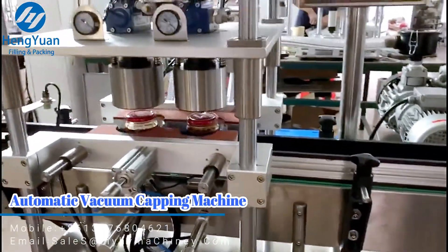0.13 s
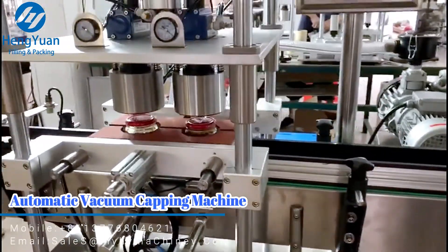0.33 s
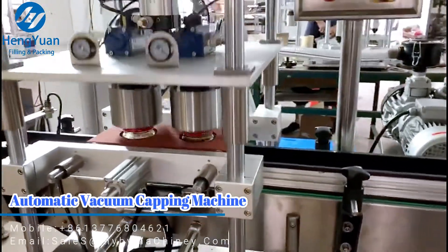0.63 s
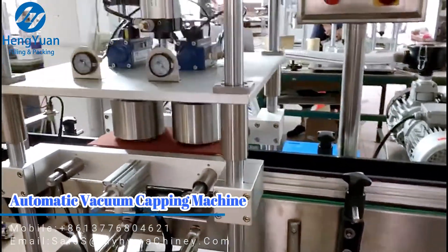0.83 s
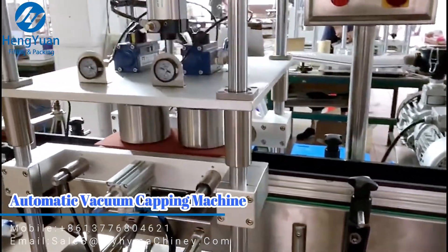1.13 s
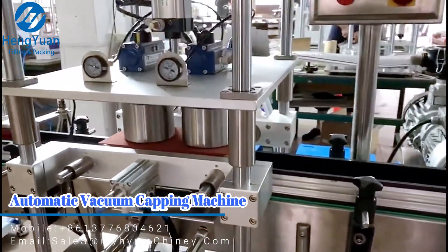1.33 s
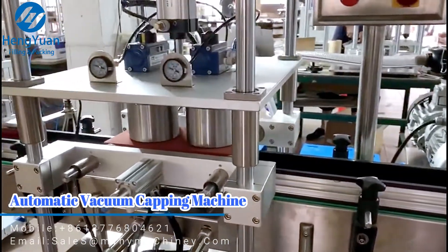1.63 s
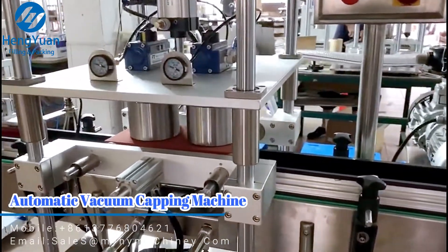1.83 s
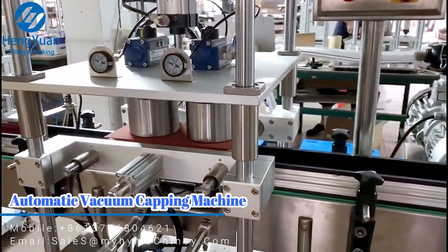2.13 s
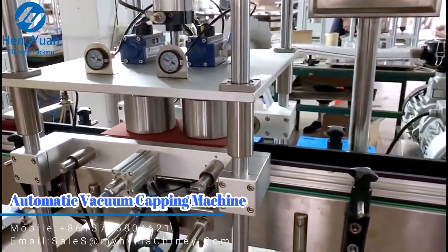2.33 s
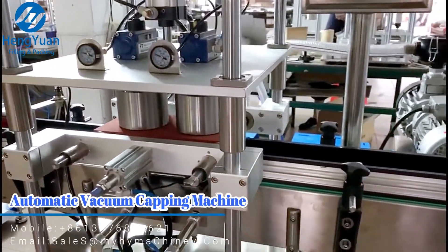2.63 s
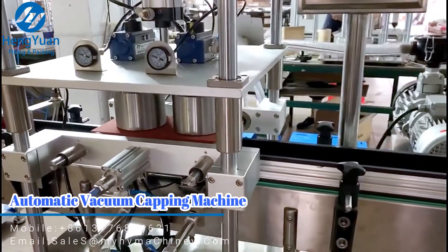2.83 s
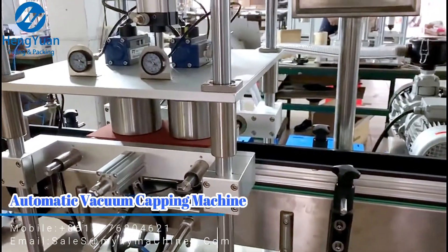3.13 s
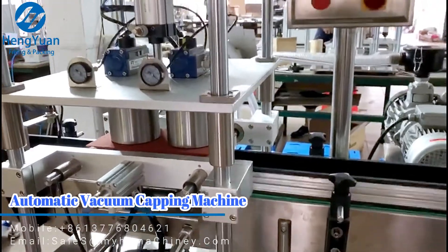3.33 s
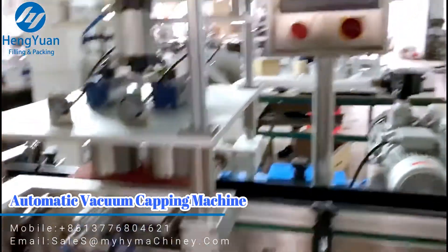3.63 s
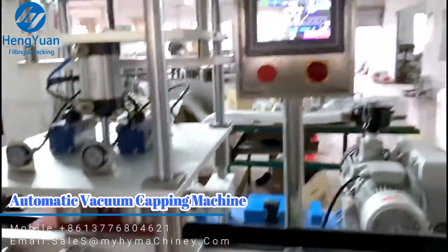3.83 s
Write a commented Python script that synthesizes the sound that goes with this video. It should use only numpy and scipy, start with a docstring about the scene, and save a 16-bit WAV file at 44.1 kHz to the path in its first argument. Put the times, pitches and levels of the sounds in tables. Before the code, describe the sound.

Close by in a factory hall, a capping machine clunks and hisses, pops out air with brief falling whistles, rattles, quietens, then thumps and vents again, ending on a sharp air blast over steady low hum.

```python
"""A conveyor rumbles under humming motors and a steady hall wash while a thin air leak hisses, then closes.
Over this bed a pneumatic jar-capping machine works through one cycle: its head thumps, parts knock and clack,
loose fittings chatter, cylinders vent, and solenoid valves tick and dump air with a falling whistle.
Air and wash are coloured noise, hum and whistles unsteady tones, and struck parts damped sines or noise bursts."""
import sys
import numpy as np
from scipy import signal
from scipy.fft import rfft, irfft
from scipy.io import wavfile

SR = 44100
rng = np.random.default_rng(int(sys.argv[2]) if len(sys.argv) > 2 else 0)


def materialize(psi):
    """Save the field psi as 16-bit PCM at rate SR to the path in sys.argv[1].

    A 1-D psi becomes a single channel; in a 2-D psi each row is a channel.
    """
    bounded = np.clip(np.atleast_2d(psi).T, -1, 1)
    quanta = np.round(bounded * 32767).astype(np.int16)
    wavfile.write(sys.argv[1], SR, quanta)


N = 176400
T = np.arange(N) / SR
FREQS = np.maximum(np.fft.rfftfreq(N, 1 / SR), 1)


def undb(db):
    """Decibels to an amplitude factor."""
    return 10 ** (np.asarray(db) / 20)


def unit(x):
    """Scale to an RMS of 1."""
    return x / np.sqrt(np.mean(x ** 2))


def across(points, axis=1):
    """One column of a spectrum table at every frequency, joined along log frequency."""
    points = np.array(points, float)
    return np.interp(np.log(FREQS), np.log(points[:, 0]), points[:, axis])


def wander(x, step):
    """A random value of unit spread at every step along x, with straight glides between."""
    return np.interp(x / step, np.arange(8192), rng.standard_normal(8192))


def envelope(start, rise, length, fall, sag_db=0):
    """Rise, sag in dB per second until length after the start, then die away exponentially."""
    t = np.maximum(T - start, 0)
    opening = np.minimum(t / rise, 1)
    sag = undb(-sag_db * np.minimum(t, length))
    closing = np.exp(-np.minimum(np.maximum(t - length, 0) / fall, 60))
    return opening * sag * closing


# the two microphones: (frequency [Hz], likeness [0-1], left minus right [dB])
MICROPHONES = [(30, 0.85, 6), (99, 0.93, -2), (220, 0.91, -0.5), (425, 0.5, 0.5), (900, 0.1, 7),
               (1600, 0, 3), (3400, 0.17, 1.5), (7400, 0, -0.5), (14100, 0.5, 0)]
RIPPLE_ROOT_HZ = 0.55  # spacing of ripple points, in square-root Hz


def noise(colour, ripple_db=0):
    """Coloured noise at two microphones: likeness sets the balance of their sum and difference."""
    like = np.clip(across(MICROPHONES), -1, 1)
    mid, side = rfft(rng.standard_normal((2, N))) * np.sqrt([1 + like, 1 - like])
    ripple = ripple_db * wander(np.sqrt(FREQS), RIPPLE_ROOT_HZ)
    gain = undb(across(colour) + ripple)
    return unit(irfft(np.array([mid + side, mid - side]) * gain, N))


def whistle(hz, width_hz):
    """An unsteady tone in two channels: random drift of size and phase widens its line."""
    drift = np.array([wander(T, 1 / width_hz) + 1j * wander(T, 1 / width_hz) for _ in range(2)])
    carrier = np.exp(2j * np.pi * np.cumsum(hz + 0 * T) / SR)
    return unit((drift * carrier).real)


RIPPLE_DB, RIPPLE_SHIFTS_PER_S = 5.5, 3.5
JET_FLUTTER_DB, JET_FLUTTER_S = 2.5, 0.012


def jet(colour):
    """Escaping air flutters; nearby steel plates ripple its spectrum, and the fine colour keeps shifting."""
    turn = 2 * np.pi * (RIPPLE_SHIFTS_PER_S * T + rng.random())
    air = np.cos(turn) * noise(colour, RIPPLE_DB) + np.sin(turn) * noise(colour, RIPPLE_DB)
    return unit(air * undb(JET_FLUTTER_DB * wander(T, JET_FLUTTER_S)))


# colour of the hall wash: (frequency [Hz], relative level per hertz [dB])
HALL_COLOUR = [(25, 17), (100, -1), (300, 0.5), (500, 4.5), (700, 0), (1000, 4), (2200, 5), (3200, 0.5),
               (4500, -2), (6800, -10.5), (9000, -2.5), (11200, -23), (12500, -4.5), (15500, -17)]
HALL_DB = -44.5


def hall_wash():
    """Steady broad noise stands for the blended sound of the hall."""
    return noise(HALL_COLOUR) * undb(HALL_DB)


# motor hum tones: (frequency [Hz], level [dB])
HUM_TONES = [(65, -52), (95, -52), (188.4, -54.5), (279.9, -53.5)]
HUM_WAVER_HZ = 5


def motor_hum():
    """Low motor tones waver independently, the same in both channels."""
    return sum(undb(db) * whistle(hz, HUM_WAVER_HZ)[0] for hz, db in HUM_TONES)


# conveyor loudness: (time [s], level [dB])
CONVEYOR_LEVEL = [(0, -35), (.6, -35.5), (1.2, -36.5), (1.5, -41), (1.8, -36.5), (2.3, -34), (2.65, -44.5),
                  (3.1, -38.5), (3.4, -40.5), (4, -45.5)]
# conveyor colour: (frequency [Hz], relative level per hertz [dB])
RUMBLE_COLOUR = [(20, -18), (35, -18), (50, 6), (70, -2), (100, 3.5), (125, 1), (155, -8), (195, -12.5),
                 (400, -12.5), (800, -25), (3000, -62)]


def conveyor():
    """Low coloured noise makes the conveyor rumble, its loudness swelling and easing."""
    times, levels_db = np.array(CONVEYOR_LEVEL).T
    return noise(RUMBLE_COLOUR) * undb(np.interp(T, times, levels_db))


# fine air sizzle, also used by vents and valve ticks: (frequency [Hz], relative level per hertz [dB])
SIZZLE_COLOUR = [(500, -8), (2000, -14), (5800, -0.5), (7100, -13), (8500, 2.5), (10200, 4.5), (11300, -38),
                 (12400, 9), (14000, 1.5), (15500, -9)]
LEAK_HZ, LEAK_WIDTH_HZ = 10300, 100
LEAK_DB, LEAK_WHISTLE_DB, LEAK_SAG_DB_PER_S, LEAK_END_S = -41, -53, 32, 0.54


def air_leak():
    """A thin leak hisses and whistles, sags, then closes."""
    hiss = undb(LEAK_DB) * noise(SIZZLE_COLOUR)
    tone = undb(LEAK_WHISTLE_DB) * whistle(LEAK_HZ, LEAK_WIDTH_HZ)
    return (hiss + tone) * envelope(0, 0.0026, LEAK_END_S, 0.037, LEAK_SAG_DB_PER_S)


# loose parts while the head travels: (start [s], end [s], smallest tick level [dB], centre pitch [Hz])
CHATTER_SPELLS = [(0.593, 0.862, -45, 2430), (0.893, 1.199, -48.5, 1127), (1.66, 2.37, -42, 515)]
CHATTER_PER_S, CHATTER_SPAN_DB, CHATTER_RING_S, CHATTER_SPREAD_OCTAVES = 110, 12, 0.0055, 2.124


def chatter():
    """Caps, jars and fittings tick against each other, each with its own short damped ring."""
    out, t = np.zeros((2, N)), T[:SR // 10]
    for first, last, db, centre_hz in CHATTER_SPELLS:
        span = last - first
        ticks = rng.random(size=(128, 5))[:int(span * CHATTER_PER_S)]
        for when, pitch, size, left, right in ticks:
            hz = centre_hz * 2 ** (CHATTER_SPREAD_OCTAVES * (pitch - 0.5))
            phase = np.array([[left], [right]])
            ring = np.sin(2 * np.pi * (hz * t + phase)) * np.exp(-t / CHATTER_RING_S)
            i = int((first + when * span) * SR)
            out[:, i:i + len(t)] += undb(db + CHATTER_SPAN_DB * size ** 2) * ring  # mostly small ticks
    return out


# hollow knocks of jars, clamps and plates: (time [s], level [dB], centre pitch [Hz], ring decay [s])
KNOCK_HITS = [(0.111, -40, 441, 0.03), (.32, -31.5, 983, 0.0057), (.337, -37, 1015, 0.023),
              (.365, -25.5, 990, 0.0064), (.372, -33, 529, 0.023), (.377, -20, 268, 0.011),
              (0.656, -31.5, 2694, 0.016), (.786, -33, 3000, 0.014), (.814, -29.5, 1464, 0.0088),
              (.882, -23, 950, 0.0058), (.889, -31, 560.3, 0.026), (1.07, -37.5, 1030, 0.022),
              (1.641, -25, 374, 0.014), (1.807, -29, 345, 0.0068), (1.823, -29, 285.7, 0.057),
              (1.939, -24, 365, 0.0072), (2.017, -37, 333.3, 0.076), (2.14, -27, 378, 0.013),
              (2.153, -26, 250.3, 0.032), (2.221, -34.5, 954, 0.012), (2.236, -32.5, 399, 0.024),
              (2.348, -35, 493, 0.011), (2.81, -41.5, 400, 0.051), (3.116, -30.5, 1597, .014),
              (3.118, -36, 352.4, 0.075), (3.173, -22, 1250, 0.0083), (3.18, -24.5, 598, 0.0099),
              (3.943, -28, 437, 0.017)]
KNOCK_SPREAD_OCTAVES, KNOCK_APART_HZ = 1.2, 830
STRIKE_RISE_S = 0.00057  # shared by knocks and clacks


def knocks():
    """Each struck part rings in six damped modes; the higher ones reach the microphones out of step."""
    out, t = np.zeros((2, N)), T[:SR // 2]
    for start, db, hz, ring in KNOCK_HITS:
        place, phase, skew = rng.random((3, 6, 1))
        position = (np.arange(len(place))[:, None] + place) / len(place)
        mode_hz = hz * 2 ** (KNOCK_SPREAD_OCTAVES * (position - 0.5))
        apart = (skew - 0.5) * np.minimum(mode_hz / KNOCK_APART_HZ, 1) ** 2 / 2
        modes = np.sin(2 * np.pi * (mode_hz * t + phase + np.array([apart, -apart]))).sum(axis=1)
        shape = envelope(0, STRIKE_RISE_S, STRIKE_RISE_S, ring)[:len(t)]
        # the level holds however the random modes add up
        blow = undb(db) * unit(modes * shape) * np.sqrt(np.mean(shape ** 2))
        i = int(start * SR)
        out[:, i:i + len(t)] += blow[:, :N - i]
    return out


# light metal contacts: (time [s], level [dB], noise decay [s])
CLACK_HITS = [(.363, -33.5, 0.019), (.513, -32.5, .014), (.814, -32, 0.013), (0.934, -37, 0.018),
              (1.066, -34, 0.032), (1.639, -31.5, .0064), (1.688, -35.5, 0.39), (1.939, -24.5, 0.0088),
              (2.017, -38.5, 0.053), (3.115, -38, 0.025), (3.173, -33.5, 0.034)]
# clack colour: (frequency [Hz], relative level per hertz [dB])
CLACK_COLOUR = [(300, -3), (650, -12.5), (900, 12), (1400, 5), (2000, -4.5), (4000, 5), (7000, -22),
                (15000, -55)]
# ringing of the frame: (frequency [Hz], relative level [dB], time to fall 60 dB [s])
FRAME_MODES = [(397, -7, 0.08), (911, -1, 0.14), (953, -14, 0.11), (1183, 5, 0.12), (1360, 3, 0.13),
               (2060, -9, 0.27)]
FRAME_DB = -5.5


def clacks():
    """Clamps and fittings meet: a burst of bright noise, and an impulse that rings the frame's modes."""
    clack, pushes, out = noise(CLACK_COLOUR), np.zeros((2, N)), 0
    for start, db, ring in CLACK_HITS:
        out = out + undb(db) * clack * envelope(start, STRIKE_RISE_S, STRIKE_RISE_S, ring)
        pushes[:, min(int(start * SR), N - 1)] += undb(db)
    frame = 0
    for hz, db, t60 in FRAME_MODES:
        phase = rng.random((2, 1))
        frame = frame + undb(db - 60 * T / t60) * np.sin(2 * np.pi * (hz * T + phase))
    return out + undb(FRAME_DB) * signal.fftconvolve(pushes, frame, axes=1)[:, :N]


# heavy stops of the head and slides: (time [s], level [dB], starting pitch [Hz], ring decay [s])
THUMP_HITS = [(.386, -16.5, 210, 0.019), (0.52, -23, 104, 0.012), (0.823, -18, 117, 0.011),
              (1.065, -23.5, 293, 0.0053), (2.022, -19.5, 95.5, 0.0097), (2.304, -25, 126, 0.011),
              (3.12, -16, 111, 0.014)]
THUMP_RISE_S, THUMP_SETTLE_S, BED_HZ = 0.0071, 0.01, 88


def thumps():
    """A cushioned stop heaves the machine bed: a damped sine whose pitch settles to the bed's own."""
    out = 0
    for start, db, hz, ring in THUMP_HITS:
        t = np.maximum(T - start, 0)
        settling = THUMP_SETTLE_S * (1 - np.exp(-t / THUMP_SETTLE_S))
        turns = BED_HZ * t + (hz - BED_HZ) * settling
        heave = np.sqrt(2) * np.sin(2 * np.pi * turns)
        out = out - undb(db) * heave * envelope(start, THUMP_RISE_S, THUMP_RISE_S, ring)
    return out


# cylinder vents; length runs from the start to the final fall, and a negative sag swells:
# (time [s], rise [s], length [s], sag [dB/s], rush level [dB], sizzle level [dB])
VENT_EVENTS = [(0.501, 0.033, 0.055, 77, -26, -25), (0.552, 0.018, 0.298, -9, -41, -41),
               (0.868, 0.0051, 0.0046, 60, -43, -18), (0.877, 0.024, .16, 56, -29.5, -22.5),
               (0.872, 0.063, 0.37, 24, -27.5, -60), (1.537, 0.0063, 0.093, 32, -32.5, -46),
               (1.736, 0.017, 0.3, 18, -34.5, -45), (2.013, 0.0068, 0.023, 80, -23.5, -51),
               (2.058, 0.016, 0.18, 45, -34, -49), (2.29, 0.021, 0.026, 75, -37.5, -35),
               (2.797, 0.008, 0.056, 230, -25, -30.5), (3.107, 0.013, 0.055, 48, -29, -33.5),
               (3.162, 0.014, 0.068, 100, -51, -20), (3.194, 0.023, 0.066, 68, -33, -45)]
# broad rush of the silencers: (frequency [Hz], relative level per hertz [dB])
RUSH_COLOUR = [(200, -6), (600, -2), (1200, 0.5), (2200, 7), (3000, 3.5), (4000, 6.5), (5800, 2),
               (7100, -6), (8600, -0.5), (11000, -22), (15000, -68)]
VENT_FALL_S = 0.025


def vents():
    """Cylinders exhaust through silencers: a broad rush and a fine sizzle, most sagging as they empty."""
    out = 0
    for start, rise, length, sag_db, rush_db, sizzle_db in VENT_EVENTS:
        air = undb(rush_db) * jet(RUSH_COLOUR) + undb(sizzle_db) * jet(SIZZLE_COLOUR)
        out = out + air * envelope(start, rise, length, VENT_FALL_S, sag_db)
    return out


# valve dumps: (time [s], blast level [dB], following hiss level [dB], hiss length [s])
VALVE_DUMPS = [(1.64, -16, -23, .085), (1.938, -16, -22, .105), (3.941, -15.5, -22, .09)]
# colour of the dumped air: (frequency [Hz], relative level per hertz [dB])
BLAST_COLOUR = [(200, 3), (450, -1), (680, -13), (1300, -6.5), (2000, 2), (2700, 7.5), (4000, -0.5),
                (5800, 7), (7100, -1.5), (8400, 7.5), (10300, 7.5), (11300, -20.5), (13200, 12),
                (15500, -7)]
BLAST_RISE_S, BLAST_LENGTH_S, BLAST_FALL_S = 0.006, 0.0053, 0.012  # the fall starts before the rise ends
FOLLOW_SAG_DB_PER_S, FOLLOW_FALL_S = 16, 0.021
TICK_LEAD_S, TICK_DB, TICK_FALL_S = 0.0094, -21.5, 0.0035
WHISTLE_HZ, WHISTLE_SAG_PER_S, WHISTLE_WIDTH_HZ = 6440, 14, 510
WHISTLE_DB, WHISTLE_LENGTH_S = -0.5, 0.039  # level relative to the blast
SPIT_DB, SPIT_S, WHISTLE_JITTER = -1.5, 0.002, 0.09  # the blast sputters as the valve opens


def valves():
    """A solenoid tick, a spitting blast whose broken whistle falls with the pressure, then the rest of the air."""
    tick, out = noise(SIZZLE_COLOUR), 0
    for start, db, follow_db, length in VALVE_DUMPS:
        pressure_fall = -WHISTLE_SAG_PER_S * np.maximum(T - start, 0)
        hz = WHISTLE_HZ * np.exp(pressure_fall + WHISTLE_JITTER * wander(T, SPIT_S))
        spit = unit(undb(SPIT_DB * np.tanh(wander(T, SPIT_S))))
        blast = undb(db) * spit * envelope(start, BLAST_RISE_S, BLAST_LENGTH_S, BLAST_FALL_S)
        follow_shape = envelope(start + BLAST_LENGTH_S, 0.01, length, FOLLOW_FALL_S, FOLLOW_SAG_DB_PER_S)
        flow = blast + undb(follow_db) * follow_shape
        tick_shape = envelope(start - TICK_LEAD_S, 0.0011, 0.00092, TICK_FALL_S)
        tone_shape = envelope(start, BLAST_RISE_S, WHISTLE_LENGTH_S, TICK_FALL_S, sag_db=330)
        tone = spit * whistle(hz, WHISTLE_WIDTH_HZ) * tone_shape
        out = out + flow * jet(BLAST_COLOUR)
        out = out + undb(TICK_DB) * tick * tick_shape
        out = out + undb(db + WHISTLE_DB) * tone
    return out


ROOM_DB, ROOM_LOW_DB, ROOM_T60_S, ROOM_LONG_T60_S = -7.5, -13, 0.29, 0.84


def room(x):
    """The hall's tail is decaying noise in three parts: short midrange, longer full-band and short bass."""
    # (colour as (frequency [Hz], level [dB]), time to fall 60 dB [s], level [dB])
    parts = [([(150, -50), (400, -1), (4500, -5), (7000, -14)], ROOM_T60_S, ROOM_DB),
             ([(4500, 6.6), (7000, 7.1)], ROOM_LONG_T60_S, ROOM_DB - 9.5),
             ([(150, 1), (400, -31)], ROOM_T60_S, ROOM_LOW_DB)]
    tail = 0
    for colour, t60, db in parts:
        decay = envelope(0.0008, 0.004, 0.0081, t60 / np.log(1000))
        response = unit(rng.standard_normal((2, N)) * decay) / np.sqrt(N)
        tail = tail + undb(db) * irfft(rfft(response) * undb(across(colour)), N)
    return signal.fftconvolve(x, tail[:, :N // 2], axes=1)[:, :N]


def scene():
    """Machine in its room, thumps and background, balanced between the microphones at each frequency."""
    background = hall_wash() + motor_hum() + conveyor() + air_leak()
    machine = chatter() + knocks() + clacks() + vents() + valves()
    sound = background + thumps() + machine + room(machine)
    balance_db = across(MICROPHONES, axis=2)
    # each bin is doubled to fit the spectrum padded to twice the length
    side_db = np.repeat([balance_db, -balance_db], 2, axis=1)[:, :N + 1] / 2
    return irfft(rfft(sound, 2 * N) * undb(side_db))[:, :N]


TOP_HZ = 15500


def record(dry):
    """The recorder cuts the top with a steep low-pass filter."""
    low_pass = signal.ellip(8, 0.2, 70, TOP_HZ, fs=SR, output="sos")
    return signal.sosfilt(low_pass, dry)


dry = scene()
out = record(dry)
materialize(out)
```